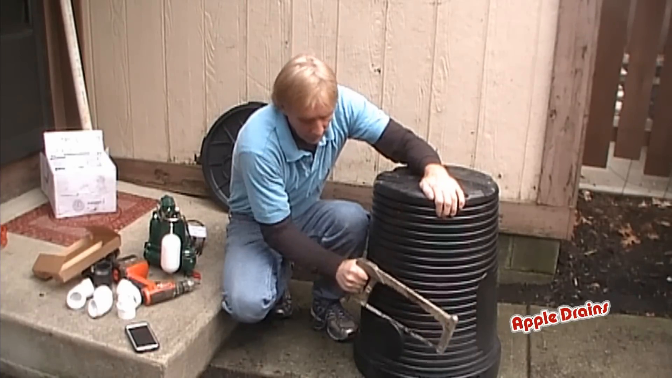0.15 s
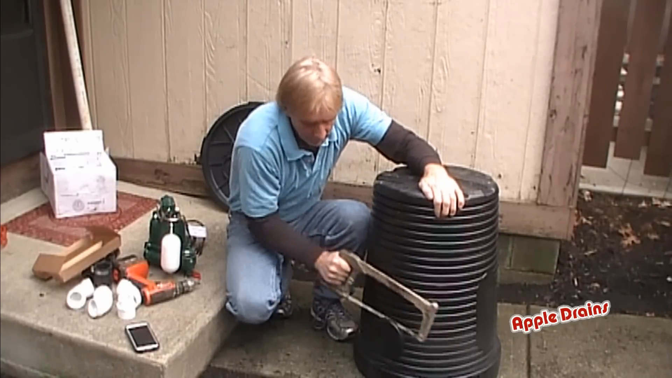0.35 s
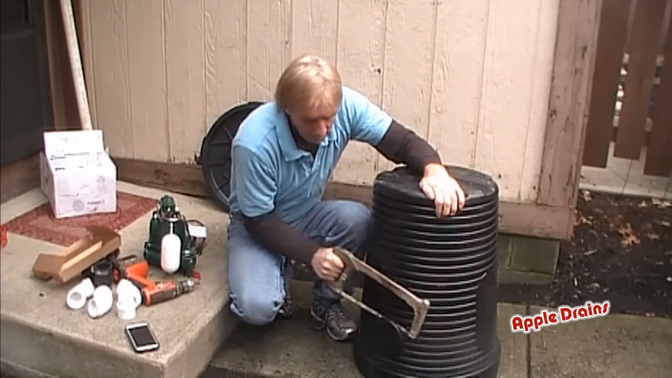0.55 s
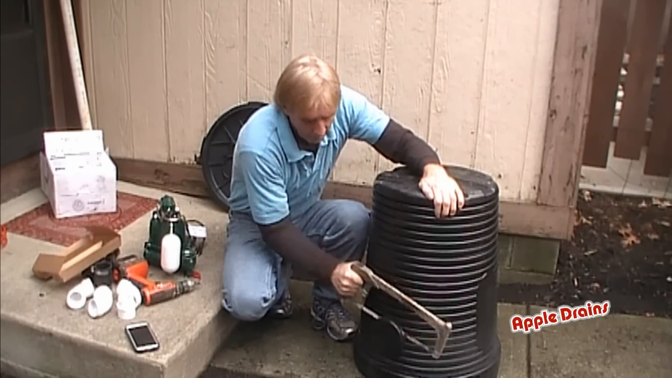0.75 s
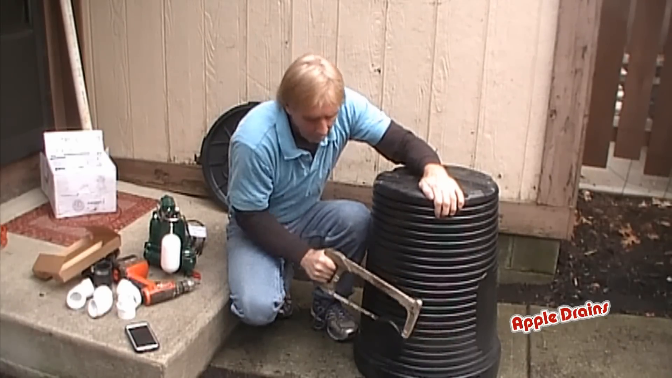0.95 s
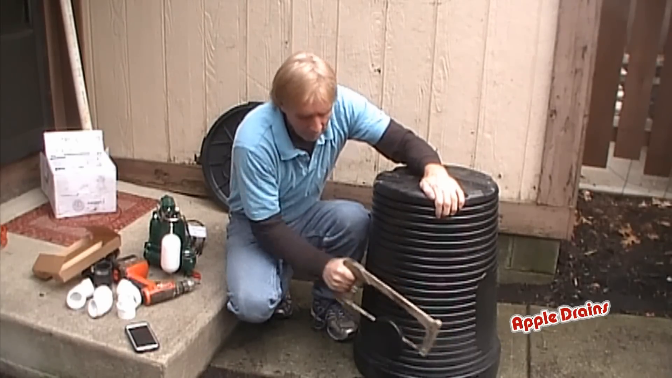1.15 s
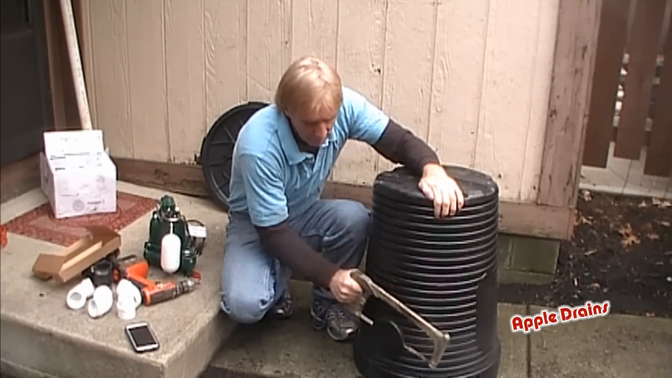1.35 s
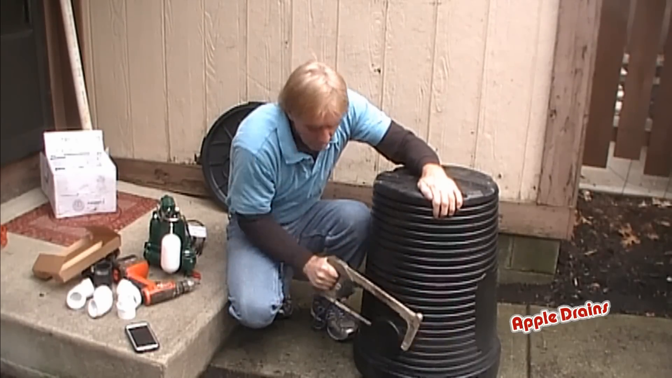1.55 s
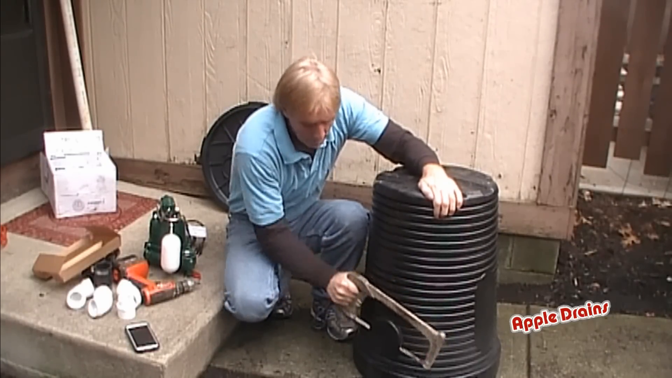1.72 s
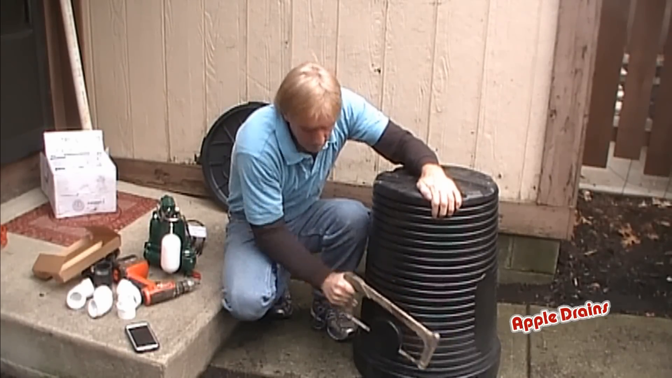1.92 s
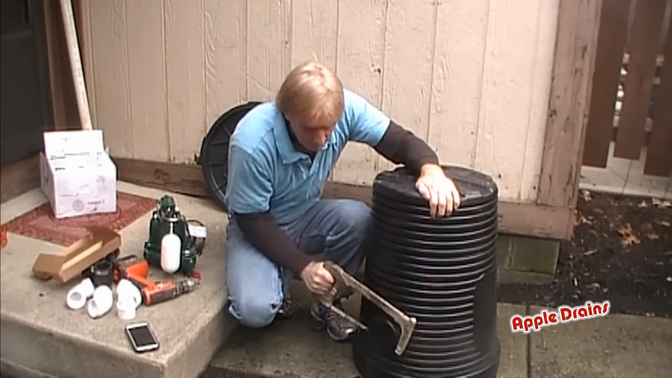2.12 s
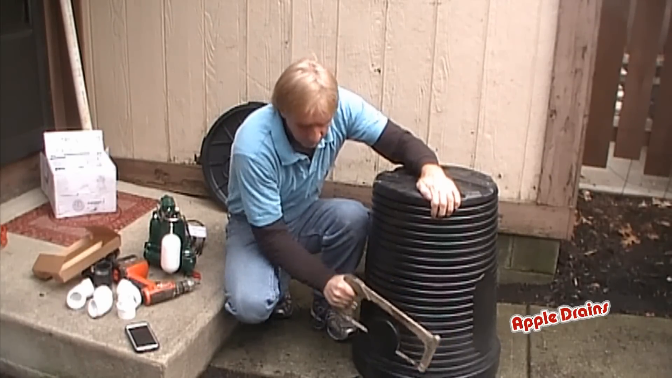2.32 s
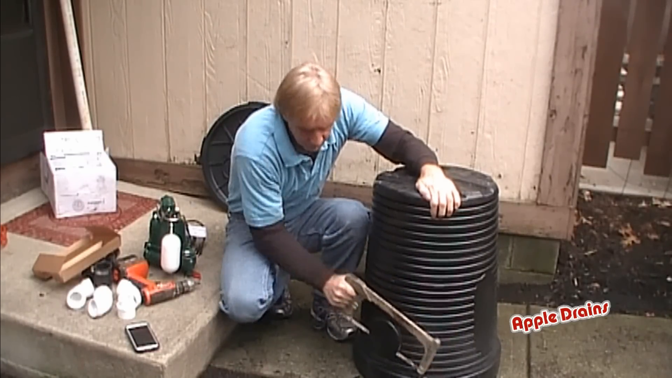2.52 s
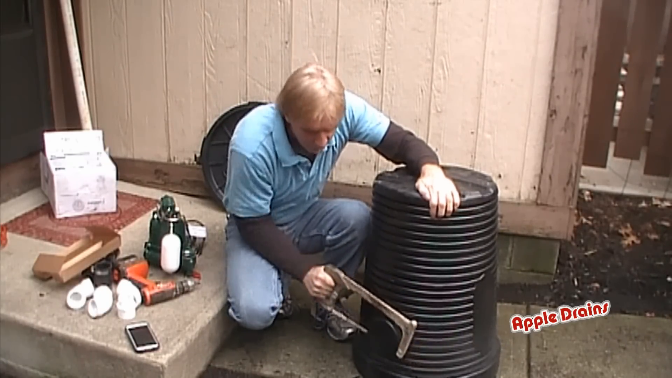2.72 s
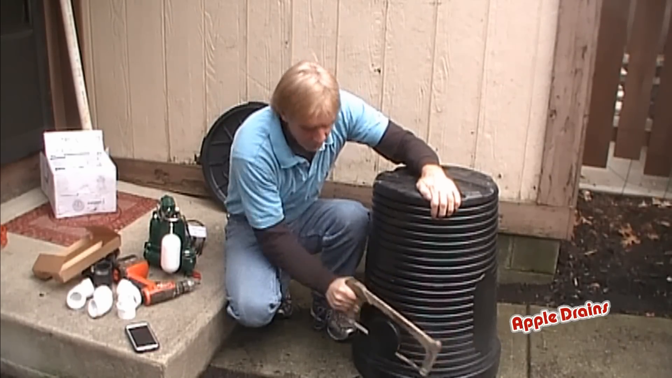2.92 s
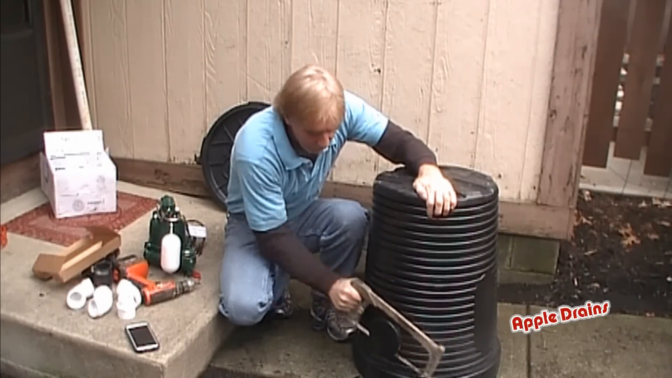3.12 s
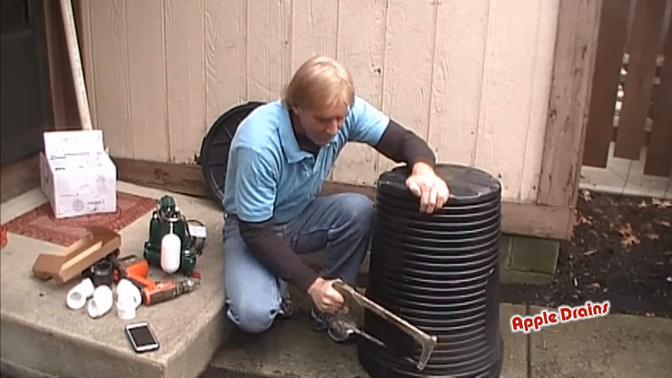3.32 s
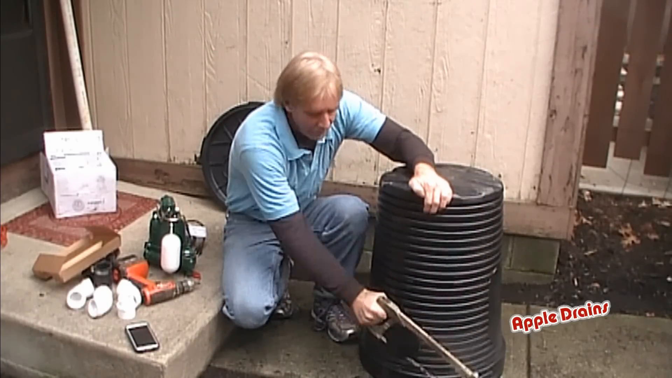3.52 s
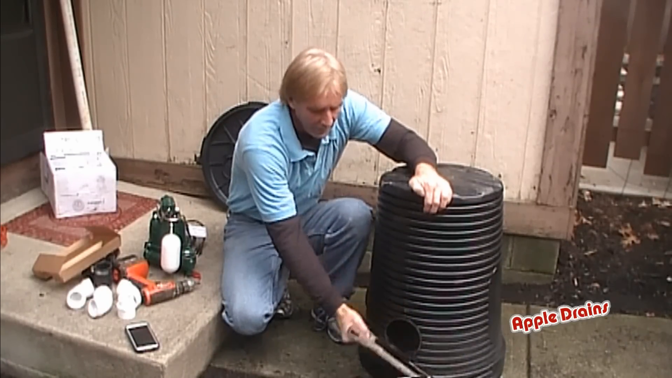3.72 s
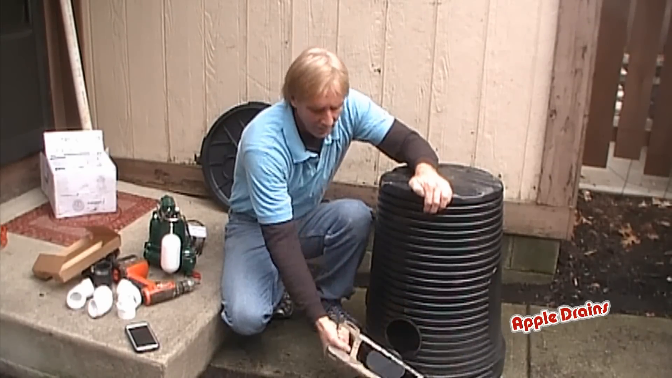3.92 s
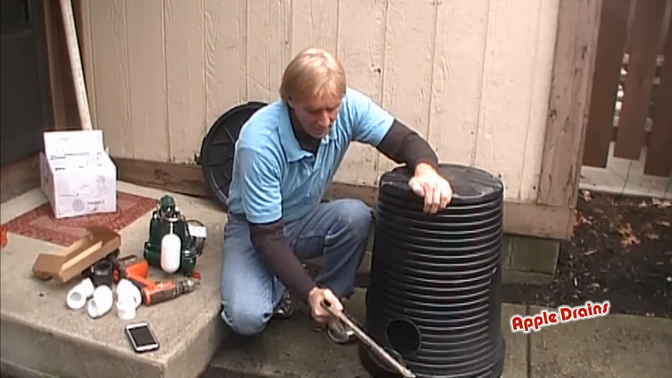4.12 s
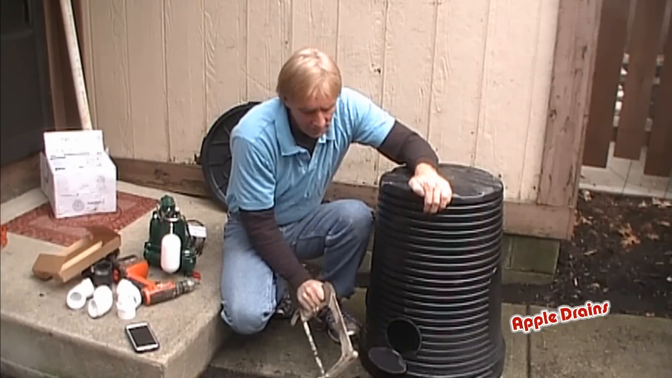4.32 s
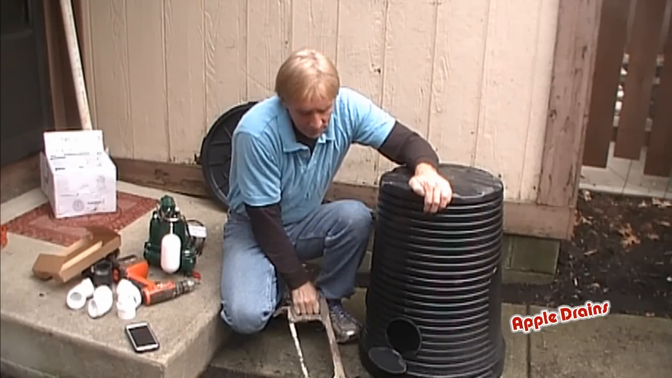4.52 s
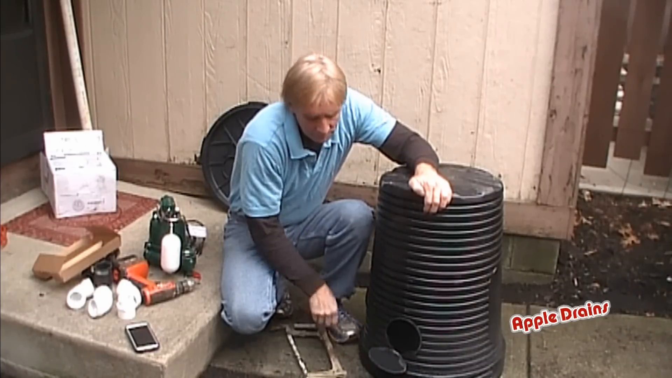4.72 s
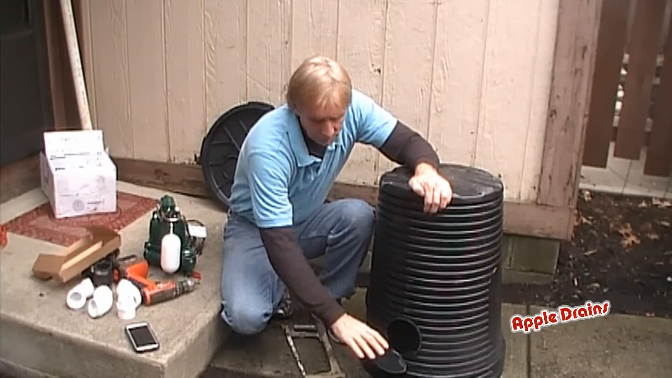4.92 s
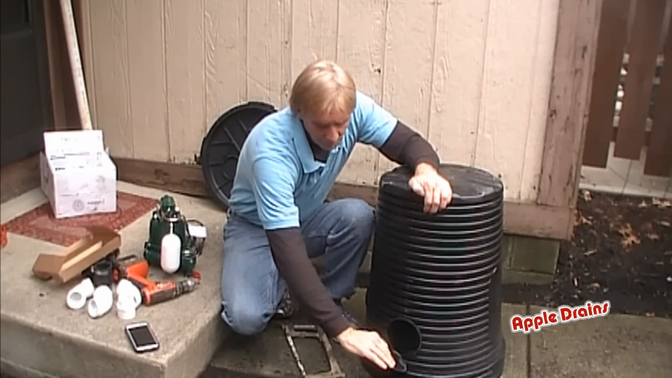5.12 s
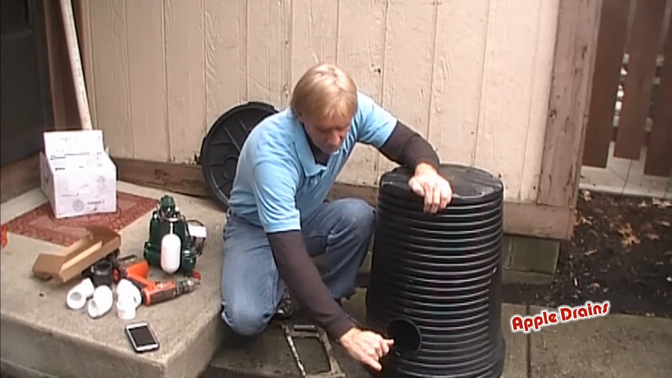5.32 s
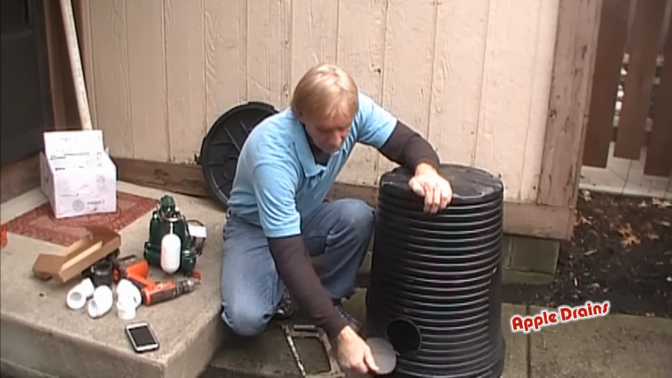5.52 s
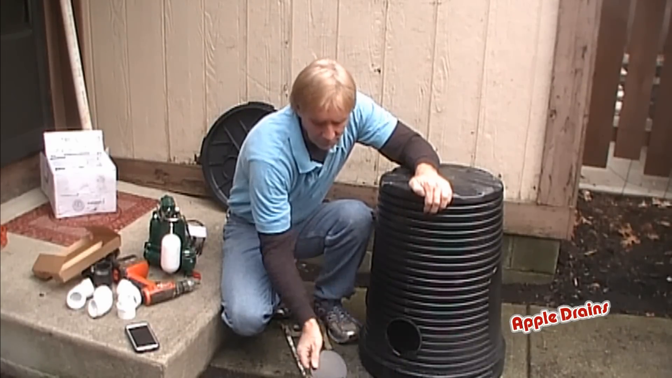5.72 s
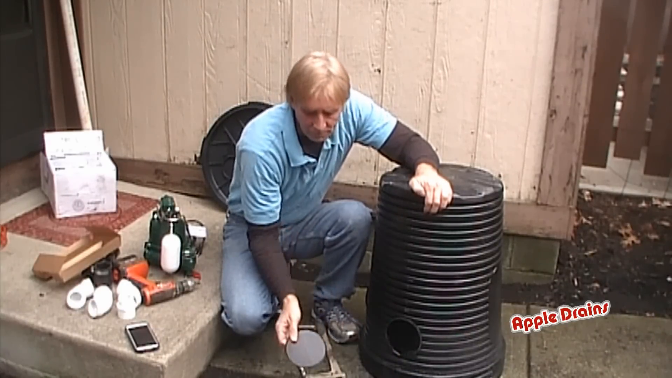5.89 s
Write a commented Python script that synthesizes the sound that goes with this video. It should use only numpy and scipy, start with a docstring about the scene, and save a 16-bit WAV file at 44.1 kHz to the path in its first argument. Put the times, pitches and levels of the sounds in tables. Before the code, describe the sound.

Outdoors near a house wall, over a soft hum of distant traffic, a hacksaw is already cutting a hollow plastic drum. From 0 to about 3.7 seconds quick strokes alternate, roughly six or seven per second; each swells and falls in pitch with blade speed, mixing toothy chirps, dry rasp and low hollow boom. Squawks and squeaks are strongest before 2 seconds, then the cutting grows duller and weaker. Snagging plastic knocks irregularly, and the loose blade clacks with brief metallic rings. Around 3.7 the last stroke trails into a rasp; a dull knock follows at 3.8, a blade clack near 3.95 and small scuffs. From 4.55 to 5.1 the steel frame clatters down corner by corner, bright and ringing, skidding over concrete. Gritty scuffs at 5.3 to 5.6 accompany picking up the offcut. A faint high bird sounds near 3.75, 4.2 and 5.6. Close microphone, slightly right, short echo.

```python
"""Over a soft yard hum of distant traffic, a hacksaw cuts the stub off a hollow plastic drum close to a house wall.
In quick strokes the teeth chirp as the blade speeds up and slows, chips rasp and the drum booms in its own modes;
noise bursts set drum and blade ringing as the plastic snags and the loose blade clacks.
The last stroke trails off in a rasp, the stub drops with a dull knock, and a far bird sings in sinking sine notes.
The steel saw is set down and skids over concrete, ringing; the offcut is picked up with gritty scuffs."""
import sys
import numpy as np
from scipy import signal
from scipy.fft import rfft, irfft, next_fast_len
from scipy.io import wavfile
from scipy.ndimage import uniform_filter1d

SR = 44100
rng = np.random.default_rng(int(sys.argv[2]) if len(sys.argv) > 2 else 0)


def unload_wav(signal):
    """Save mono or channel-first audio to the path in sys.argv[1] as 16-bit WAV at rate SR, clipped to [-1, 1]."""
    wavfile.write(
        sys.argv[1],
        SR,
        np.round(np.clip(np.atleast_2d(signal).T, -1, 1) * 32767).astype(np.int16),
    )


N = 262470
T = np.arange(N) / SR
RING_T = T[:SR // 2]  # time axis of one blow [s]

# modes of the plastic drum: (frequency [Hz], relative level [dB], t60 [s])
DRUM_MODES = [(146, -16.5, 0.22), (242, -6, 0.071), (282.6, -6.5, 0.17), (429.6, -6, 0.056),
              (468, -10, 0.11), (577, -6, 0.023), (658, -5.5, 0.083), (708, -5, 0.021), (859, -3.5, 0.045),
              (968, 8.5, 0.016), (1042, 0, 0.078), (1172.5, 6.5, 0.06), (1232, 0, 0.13), (1620, -11, 0.12),
              (1700, -22, 0.085), (2034, -6.5, 0.13)]


def undb(db):
    """Decibels to gain."""
    return 10 ** (np.asarray(db) / 20)


def unit(x):
    """Scale to rms 1."""
    return x / np.sqrt(np.mean(x ** 2))


def peak(x, db):
    """Scale a blow so that its eight strongest samples average db."""
    strongest = np.sort(np.abs(x))[-8:]
    return x * undb(db) / np.mean(strongest)


def fade(t60):
    """Exponential decay by 60 dB in t60 seconds."""
    return np.exp(-np.log(1000) * RING_T / max(t60, .002))


def envelope(s, length, attack, release):
    """Rise from time s, hold until s + length, then fall 60 dB in the release time."""
    rise = np.clip((T - s) / attack, 0, 1)
    return rise * np.exp(-np.log(1000) * np.maximum(T - s - length, 0) / release)


def add(out, s, x):
    """Mix x in at time s."""
    i = int(s * SR)
    out[i:i + len(x)] += x[:N - i]


def colour(x, points, tilt_db=0, band_hz=1000, boost_db=0):
    """Causal filter through (Hz, dB) points, tilted per octave above 600 Hz, with one boosted band."""
    size = next_fast_len(len(x) + 4096)
    size += size % 2
    octave = np.log2(np.maximum(np.fft.rfftfreq(size, 1 / SR), 10))
    hz, db = np.transpose(points)
    db = np.interp(octave, np.log2(hz), db)
    db = db + tilt_db * np.maximum(octave - np.log2(600), 0)
    db = db + boost_db * np.exp(-((octave - np.log2(band_hz)) / 0.33) ** 2)
    # folding the cepstrum makes the filter minimum phase
    cepstrum = irfft(np.log(undb(db)))
    cepstrum[1:size // 2] *= 2
    cepstrum[size // 2 + 1:] = 0
    response = np.exp(rfft(cepstrum))
    return irfft(rfft(x, size) * response)[:len(x)]


def modal(modes, ring_share=1):
    """Decaying partials of a struck body; a grip on it shortens them."""
    return sum(undb(db) * fade(t60 * ring_share) * np.cos(2 * np.pi * hz * RING_T) for hz, db, t60 in modes)


def ring(x, modes, ring_db):
    """The push itself plus the modes that it sets ringing."""
    tail = modal(modes)
    tail = tail / np.sqrt(np.sum(tail ** 2))
    return x + undb(ring_db) * signal.fftconvolve(x, tail)[:len(x)]


def walk(per_s):
    """Smooth random wandering of rms 1, faster for a higher rate per second."""
    k = max(int(SR / per_s), 1)
    return unit(uniform_filter1d(uniform_filter1d(rng.standard_normal(N), k), k))


def grit(per_s, spread_db):
    """Dense tiny clicks of unequal size."""
    size = undb(spread_db * np.minimum(rng.exponential(size=N), 4))
    happens = rng.random(N) < per_s / SR
    return unit(happens * size * rng.standard_normal(N))


def crack(t60, tail_db, tail_t60):
    """A short contact burst with a longer chatter behind it."""
    return rng.standard_normal(len(RING_T)) * (fade(t60) + undb(tail_db) * fade(tail_t60))


def yard():
    """Soft outdoor hum of distant traffic: coloured noise that wavers slowly, wider in the treble."""
    # spectrum of the yard: (frequency [Hz], relative level [dB])
    yard_colour = [(15, -96), (25, -39.5), (103, -12), (158, -8.5), (194, -13.5), (329, -10.5), (383, -13),
                   (651, -5), (976, -7.5), (1320, -11.5), (2300, -23.5), (10500, -34), (13600, -80),
                   (22000, -120)]
    level_db = -49

    def hum():
        return unit(colour(rng.standard_normal(N), yard_colour)) * undb(0.47 * walk(9.6))

    mid, side = hum(), hum()
    side = colour(side, [(100, -11.5), (600, -7.5), (2000, -5.5), (8000, -2.5)])
    return undb(level_db) * (mid + side * np.array([[1], [-1]]))


def bird():
    """A thin, far bird: high, slowly sinking sine notes with a slight quaver."""
    # (start [s], time to the release [s], starting pitch [Hz], level [dB] before the flutter)
    notes = [(3.749, 0.084, 8230, -57), (4.2, 0.12, 7417, -69), (5.587, 0.13, 8050, -55)]
    sag_hz_per_s, attack_s, release_s = 650, 0.024, 0.6
    quaver = 1 + 0.0055 * walk(150)
    flutter = undb(2 * walk(45))
    out = np.zeros(N)
    for s, length, hz, db in notes:
        pitch = (hz - sag_hz_per_s * (T - s)) * quaver
        tone = np.sin(2 * np.pi * np.cumsum(pitch) / SR)
        out += tone * undb(db) * envelope(s, length, attack_s, release_s)
    return out * flutter


def scuffs():
    """The last saw stroke trails off in a rasp; later, plastic and soles rub the gritty ground."""
    # (time of the crest [s], level [dB] of the rub before its swell and decay, t60 [s], treble tilt [dB/octave])
    rubs = [(3.69, -39, 0.81, -3.5), (3.904, -44, 0.36, 0), (4.097, -39, .08, -4),
            (4.147, -33.5, 0.22, -4.5), (4.357, -51, 0.031, 0.5), (5.326, -31, 0.11, -0.5),
            (5.48, -58.5, 0.18, -1), (5.57, -46, 0.35, -0.5)]
    # (frequency [Hz], relative level [dB])
    scuff_colour = [(60, -55), (200, -15), (300, 0.5), (700, -1), (1400, -3), (3000, -8.5), (8000, -10.5),
                    (11000, -19.5)]
    rise = 0.097  # time constant of the swell as a share of the t60
    out = np.zeros(N)
    for s, db, t60, tilt_db in rubs:
        rub = unit(colour(grit(5000, 2.1)[:SR], scuff_colour, tilt_db))
        swell = np.exp(-RING_T[::-1] / (rise * t60))
        shape = np.concatenate([swell, fade(t60)])
        add(out, s - len(swell) / SR, undb(db) * rub * shape)
    return out


def loaded(modes):
    """Every new point of contact damps and detunes the modes a little and favours other ones."""
    ground_ring_share = 0.73  # share of its free ring time that the frame keeps on the ground
    chance = rng.standard_normal((len(modes), 2))
    return [(hz * (1 + .008 * a), db + 2.5 * b, t60 * ground_ring_share)
            for (hz, db, t60), (a, b) in zip(modes, chance)]


def saw_set_down():
    """The steel frame touches down corner by corner, then skids in short catches over the concrete."""
    # (time [s], peak level [dB] before a 2 dB cut, centre of the contact's band [Hz], boost of that band [dB])
    landings = [(4.561, -8, 3100, 32), (4.561, -17.5, 3680, 39), (4.624, -23.5, 3380, 19),
                (4.659, -5.5, 3480, 21), (4.798, -8.5, 1470, 18), (4.803, -3.5, 3700, 19),
                (4.812, -3, 6000, 12.5), (4.86, -14, 3160, 16), (4.903, -14, 5500, 19),
                (4.918, -10, 6440, 17), (5.013, -14, 5000, 24), (5.055, -17, 6900, 2)]
    # the frame hanging free: (frequency [Hz], relative level [dB], t60 [s])
    frame_modes = [(915, -2, 0.12), (1410, -1, 0.1), (2000, -9, 0.37), (2065, -4, 0.25), (2700, -11, .2),
                   (2755, -6, 0.25), (2950, 5, 0.1), (3160, -13, 0.11), (3350, -11, .18), (3520, 2, 0.1),
                   (3984, -11, 0.099), (4220, -1, 0.15), (4400, -18, 0.15), (4900, 2, 0.083),
                   (5020, 2, 0.18), (5200, -23, .18), (5510, -18, .2), (6330, -22, .18), (6560, -4, 0.17),
                   (7070, 2.5, 0.14), (7940, 0, 0.15), (8839, -23, 0.16)]
    # (frequency [Hz], relative level [dB])
    steel_colour = [(100, -46), (400, -15), (1000, -8), (2000, -6), (3200, -3.5), (5200, -4), (7500, -7),
                    (9000, -6), (11000, -19.5)]
    # skids over grit: (start [s], time to the release [s], level [dB] before it sags and the frame rings)
    skids = [(4.644, 0.039, -27.5), (4.749, 0.065, -43), (4.818, 0.22, -26.5)]
    attack_s, sag_db_per_s, release_s = 0.042, 47, 0.19
    catch_s = .04  # spacing of the catches
    out = np.zeros(N)
    for s, db, band_hz, boost_db in landings:
        push = crack(0.025, -11, 0.071)
        # the corner that touches has its own boosted band; the whole frame rings on beneath it
        corner = colour(push, steel_colour, 0, band_hz, boost_db)
        frame = ring(colour(push, steel_colour), loaded(frame_modes), 9.6)
        add(out, s, peak(corner + undb(-9.5) * frame, db - 2.0))
    grains = unit(colour(grit(4500, 2.4) * undb(2.5 * walk(140)), steel_colour))
    # overlapping windows, each rung through freshly loaded modes
    window = np.sin(np.pi * np.minimum(RING_T / (2 * catch_s), 1)) ** 2
    for start, length, db in skids:
        slowing_db = sag_db_per_s * np.maximum(T - start, 0)
        skid = grains * envelope(start, length, attack_s, release_s) * undb(db - slowing_db)
        for s in np.arange(start - catch_s, start + length + release_s / 2, catch_s):
            piece = skid[int(s * SR):][:len(window)] * window
            add(out, s, ring(piece, loaded(frame_modes), -4))
    return out


def snags():
    """Plastic catches and snaps free, and the drum answers; the last, dull knock is the stub dropping."""
    # (time [s], peak level [dB] before a 0.5 dB cut, treble tilt [dB/octave], t60 of the chatter [s])
    knocks = [(.295, -6.5, 2.5, 0.041), (.427, -8.5, 0.5, 0.04), (0.748, -20, -11, 0.089),
              (1.063, -8.5, 2, 0.2), (1.671, -7.5, 8, 0.049), (1.928, -12.5, -1.5, 0.067),
              (2.06, -8, -2.5, 0.071), (2.103, -15, -8, 0.11), (2.177, -10, -8.5, 0.27),
              (2.321, -11.5, -5, 0.034), (2.848, -16.5, 0, 0.091), (3.158, -8, -1.5, 0.17),
              (3.39, -17, -2, 0.16), (3.489, -12.5, 0, 0.23), (3.597, -10.5, -5, 0.16),
              (3.823, -19.5, -14, 0.37)]
    # (frequency [Hz], relative level [dB])
    snag_colour = [(40, -25.5), (130, 1.5), (450, 8.5), (1100, 3.5), (1800, 9.5), (3300, 8.5), (6000, -2),
                   (11000, -19.5)]
    out = np.zeros(N)
    for s, db, tilt_db, t60 in knocks:
        push = crack(0.0013, 1, t60)
        push[0] += undb(12)  # one sharp onset
        knock = ring(colour(push, snag_colour, tilt_db), DRUM_MODES, -7)
        add(out, s, peak(knock, db - 0.5))
    return out


def clacks():
    """The slack blade snaps against its pins with a noisy buzz, and rings the longer the freer it is."""
    # (time [s], peak level [dB] of the clack with its ringing, before a 0.5 dB cut, share of its free ring time
    # [0-1])
    snaps = [(.027, -6.5, 0), (0.31, -10.5, 0.56), (.634, -6.5, 0.2), (0.911, -6.5, 0.34),
             (1.233, -8.5, 0.43), (1.4981, -7.5, 0.5), (1.7642, -8.5, 0.28), (2.1629, -8, .4),
             (2.4149, -7.5, 0.45), (2.565, -11.5, 0.23), (2.7039, -8.5, 0.25), (3.378, -19, 0.19),
             (3.952, -10, 0.85)]
    # the blade ringing freely: (frequency [Hz], relative level [dB], t60 [s])
    blade_modes = [(2772, -14, .08), (3085, -5, .29), (3400, -12, .05), (4350, -11, .06), (5120, -13, .07),
                   (5712, -10, .06), (6270, -2, .065), (6560, 0, .07), (7140, -9, .05), (8064, -1, .07),
                   (10040, -14, .05)]
    # (frequency [Hz], relative level [dB])
    clack_colour = [(300, -45), (1500, -27), (3000, 0.5), (4500, -2.5), (6500, 4), (8200, 5.5),
                    (10500, -6.5)]
    out = np.zeros(N)
    buzz = 1 / (1 + (RING_T / 0.0048) ** 4) + undb(-28) * fade(0.079)
    for s, db, ring_share in snaps:
        contact = colour(rng.standard_normal(len(RING_T)) * buzz, clack_colour)
        twang = modal(blade_modes, ring_share) * (1 - fade(0.0033))
        clack = peak(contact, 0) + peak(twang, -3.5) * ring_share ** 1.5
        add(out, s, peak(clack, db - 0.5))
    return out


def along_blade(x, position):
    """A weak wave returns from the blade's end; its colour slides as the cut moves along the blade."""
    i = np.arange(N)
    delay_s = .0008 + .0007 * position
    return x - .3 * np.interp(i - delay_s * SR, i, x)


def sawing():
    """Each tooth plucks the cut; tooth rate and layer levels follow the speed of the blade."""
    # strokes, pull and push in turn: (start [s], effort [dB])
    strokes = [(-.03, -25.5), (.12, -24), (0.277, -26), (.431, -20.5), (.576, -24.5), (.724, -18.5),
               (.885, -22), (1.028, -19), (1.189, -26.5), (1.33, -18), (1.486, -27), (1.629, -22),
               (1.785, -28.5), (1.915, -23.5), (2.05, -27), (2.205, -25.5), (2.376, -27.5), (2.508, -26),
               (2.675, -28.5), (2.798, -28), (2.966, -28), (3.11, -26.5), (3.28, -28), (3.451, -24)]
    last_stroke_end_s = 3.69
    # as the cut advances: (time [s], grip of the teeth [dB], give of the drum wall [dB])
    cut = [(.08, -10.5, -2.5), (.5, -2.5, 4), (.75, -4, -0.5), (1.3, 3, -4), (1.65, 3.5, -1),
           (2.0, -4, 3.5), (2.3, -20, 0), (3.1, -34, 0.5), (3.6, -30, -3.5)]
    # the teeth dig in hard for an instant and squeak: (time [s], level [dB])
    squeaks = [(.374, -14), (.628, -16), (.831, -16.5), (1.005, -19), (1.378, -19), (1.589, -19),
               (2.16, -21)]
    squeak_width_s = 0.0091  # standard deviation
    # colours of the three sounds of the cut: (frequency [Hz], relative level [dB])
    chirp_colour = [(200, -37.5), (450, 1), (750, 6.5), (1200, -4.5), (1500, -11.5), (2300, -15),
                    (3500, -9.5), (6000, -24), (11000, -16.5)]
    boom_colour = [(30, -76), (70, -20), (130, -3.5), (260, -5), (460, 5), (750, -3), (1200, -20.5),
                   (2000, -20), (5000, -44)]
    rasp_colour = [(400, -28), (900, 8.5), (1500, 9.5), (2100, 5), (2600, 2.5), (3400, 3.5), (4800, -1),
                   (6500, -1.5), (8000, -0.5), (9500, -5.5), (11000, -14)]

    # pairs are (pull, push); levels are relative to the effort of the stroke
    full_speed_tooth_hz = (1243, 1232)  # before the kerf is deep
    chatter_db, squawk_db, boom_db, rasp_db = (-2, -2.5), (5, 0), (-24, -20.5), -2.5
    bite_at, bite_width = (0.714, 0.44), (0.1, .19)  # where the teeth lock into a squawk [share of stroke]
    boom_per_effort, chatter_per_grip = 0.37, 0.098  # dB per dB
    # once the kerf is deep it drags on the push and slows it
    deep_from_s, deep_slowing = 1.55, .13

    start, effort_db = np.transpose(strokes)
    stroke = np.clip(np.searchsorted(start, T, side="right") - 1, 0, len(start) - 1)
    length = np.diff(np.append(start, last_stroke_end_s))
    share = np.clip((T - start[stroke]) / length[stroke], 0, 1)
    pushing, effort = stroke % 2, effort_db[stroke]
    swing = np.pi * (stroke + share)
    speed, position = np.abs(np.sin(swing)), (1 - np.cos(swing)) / 2
    slowing = deep_slowing * pushing * (start[stroke] > deep_from_s)
    top_hz = np.take(full_speed_tooth_hz, pushing) * (1 - slowing)
    tooth_hz = top_hz * (.15 + .85 * speed ** .85)
    cutting = np.clip((last_stroke_end_s - T) / 0.04 + 1, 0, 1)
    cut_s, grip_db, give_db = np.transpose(cut)
    grip, give = np.interp(T, cut_s, grip_db), np.interp(T, cut_s, give_db)

    def force(db, power, rest):
        """Level of a layer: the weight of the stroke times a power of the blade speed."""
        weight = uniform_filter1d(undb(db), SR // 50)
        return cutting * weight * (rest + speed ** power) / (1 + rest)

    def teeth(jitter):
        """One sharp pluck per tooth, unevenly spaced."""
        rate_hz = tooth_hz * np.exp(.025 * walk(60) + jitter * walk(1000))
        phase = np.cumsum(rate_hz) / SR % 1
        return np.exp(-phase / 0.074)

    def wall(plucks, uneven_db):
        """The drum wall radiates plucks of unequal depth."""
        push = np.gradient(plucks) * undb(uneven_db * (walk(780) + 0.66 * walk(140)))
        return unit(ring(colour(push, chirp_colour, tilt_db=-5.0), DRUM_MODES, -7))

    # mostly the teeth skip over the plastic; once a stroke they bite and lock into a pitch
    skipping, locked = teeth(.3), teeth(.1)
    chatter_level_db = effort + np.take(chatter_db, pushing) + chatter_per_grip * grip
    chatter = wall(skipping, 4.0) * force(chatter_level_db, 1.21, 0.16)

    off_bite = (share - np.take(bite_at, pushing)) / np.take(bite_width, pushing)
    bite = cutting * np.exp(-.5 * off_bite ** 2)
    bite = bite * undb(effort + np.take(squawk_db, pushing) + grip)
    digs = sum(undb(db) * np.exp(-.5 * ((T - s) / squeak_width_s) ** 2) for s, db in squeaks)
    squawk = wall(locked, 0.92) * np.hypot(bite, digs)

    thuds = grit(2200, 3.8) * undb(4.5 * walk(35))
    boom = unit(ring(colour(thuds, boom_colour), DRUM_MODES, -0.37))
    boom = boom * force(boom_per_effort * effort + np.take(boom_db, pushing) + give, 0.3, 0.17)

    chips = grit(10000, 1.6) * (.5 + skipping) * undb(0.91 * walk(110))
    rasp = unit(along_blade(colour(chips, rasp_colour), position))
    rasp = rasp * force(effort + rasp_db, 1.4, .24)
    return chatter + squawk + boom + rasp


def scene():
    """All work sounds come from a little to the right; wall and steps throw back a short echo."""
    work = sawing() + clacks() + snags() + saw_set_down() + scuffs()
    # decaying noise, silent for the first 4 ms, stands for the nearby surfaces
    echo = rng.standard_normal((2, len(RING_T))) * fade(0.19) * (RING_T > .004)
    echo /= np.sqrt(np.sum(echo ** 2, axis=1, keepdims=True))
    mid, side = (signal.fftconvolve(work, e)[:N] for e in echo)
    side = colour(side, [(150, -18), (1000, -16.0), (4000, -13.5), (8000, -10), (11000, -1.5)])
    pan_db = np.interp(T, [3.6, 4.5], [-2.6, -1.6])  # left against right
    direct = (work + undb(-7.0) * mid) * undb(np.array([pan_db, -pan_db]) / 2)
    return direct + side * np.array([[1], [-1]]) + yard() + bird()


def record(dry):
    """The microphone chain rounds the loudest swings and cuts the top steeply."""
    top_hz = 10500
    rounded = dry / (1 + (np.abs(dry) / .85) ** 6) ** (1 / 6)
    return signal.sosfilt(signal.ellip(10, .2, 75, top_hz, fs=SR, output="sos"), rounded)


dry = scene()
out = record(dry)
unload_wav(out)
```